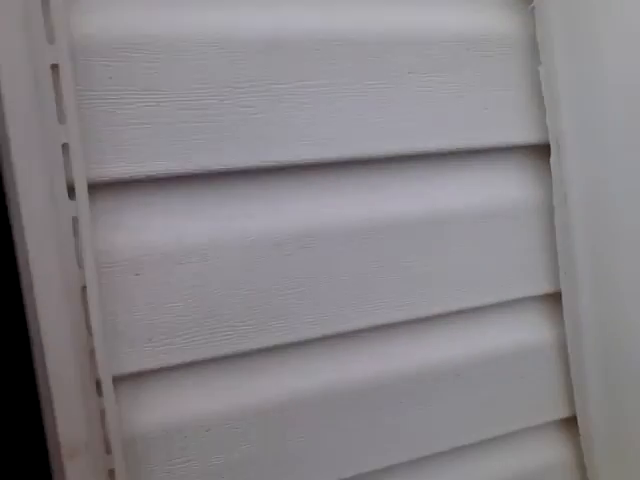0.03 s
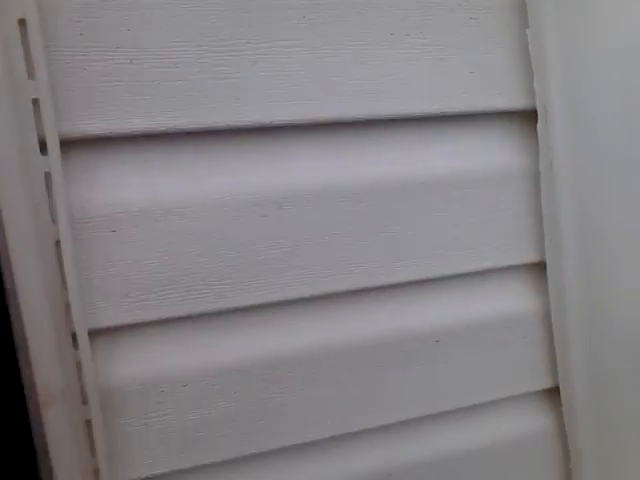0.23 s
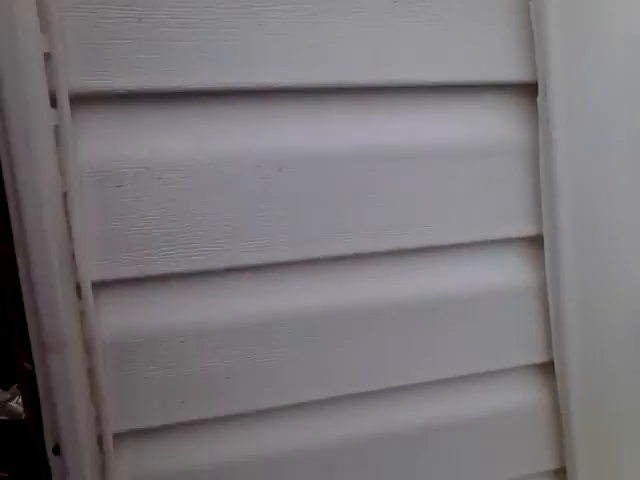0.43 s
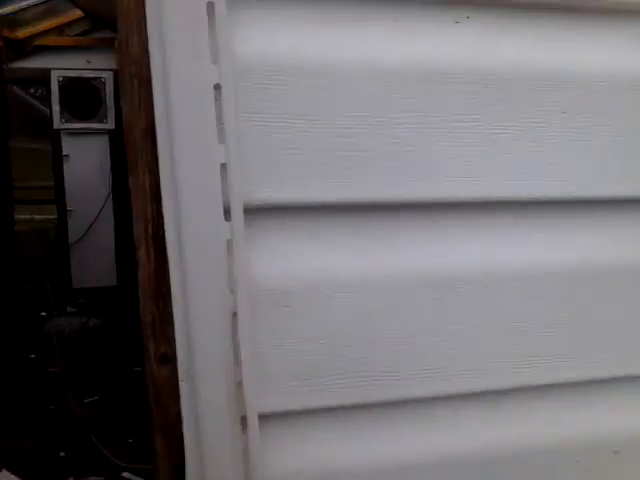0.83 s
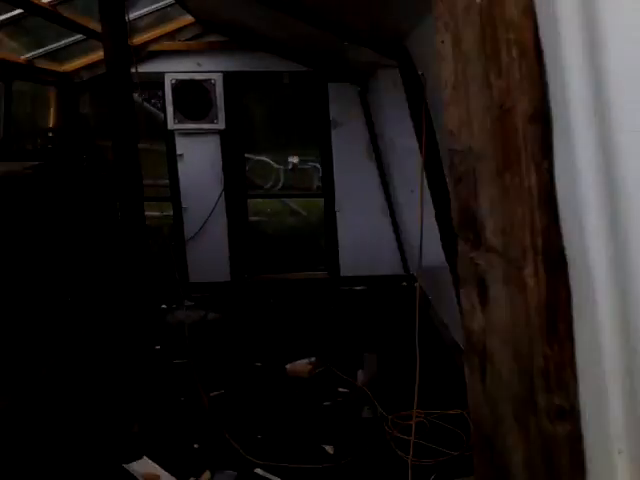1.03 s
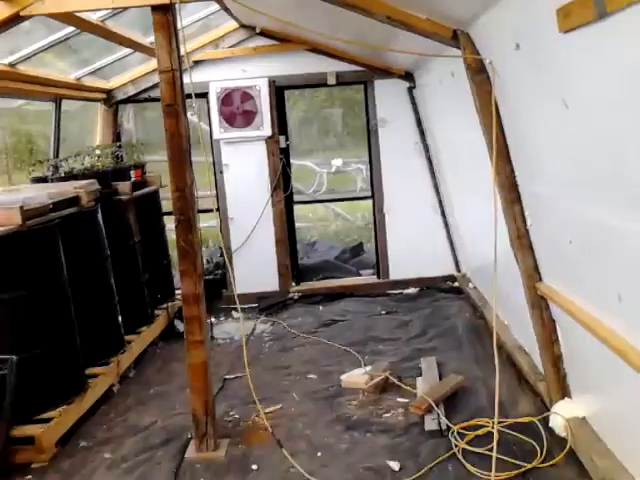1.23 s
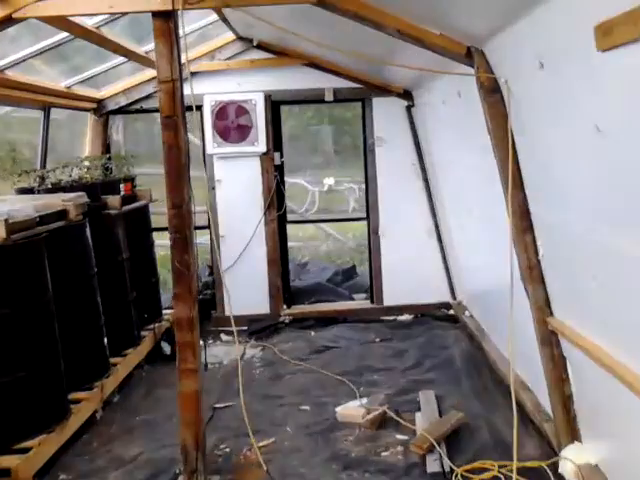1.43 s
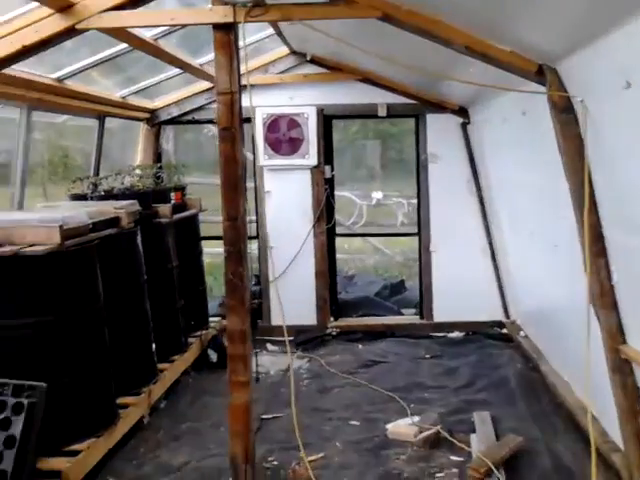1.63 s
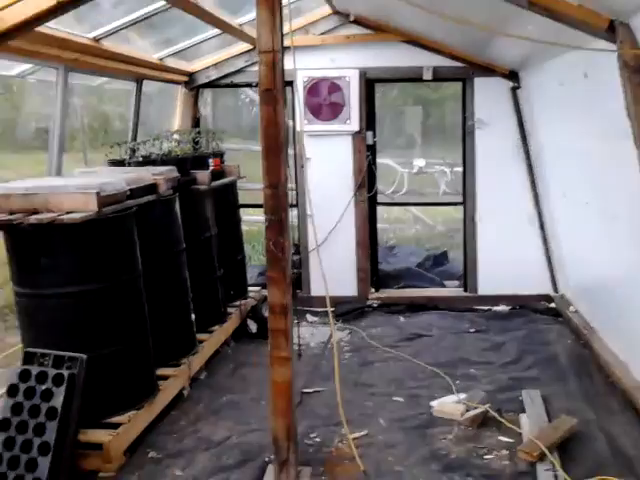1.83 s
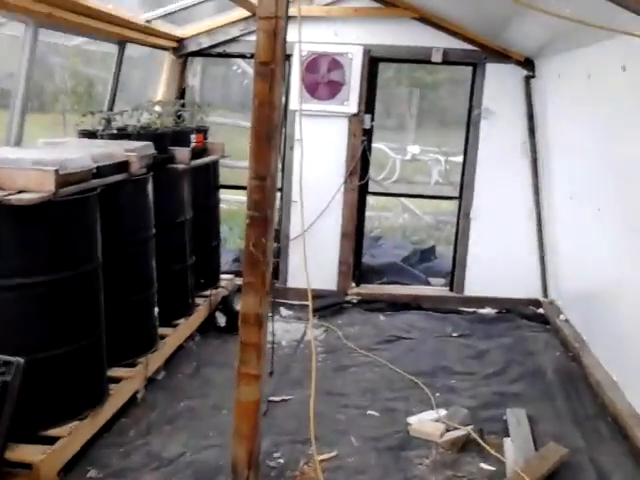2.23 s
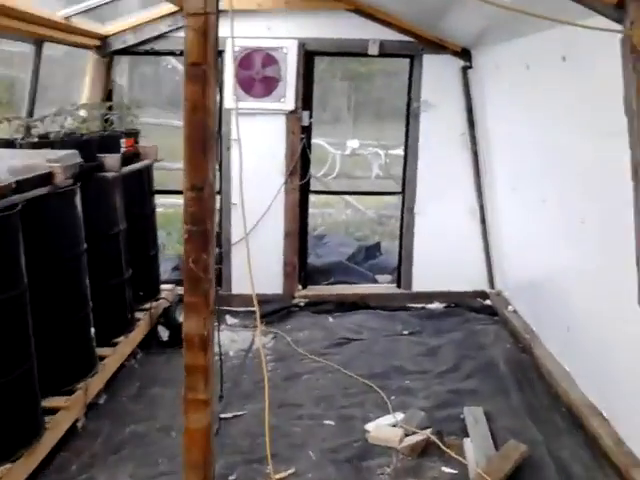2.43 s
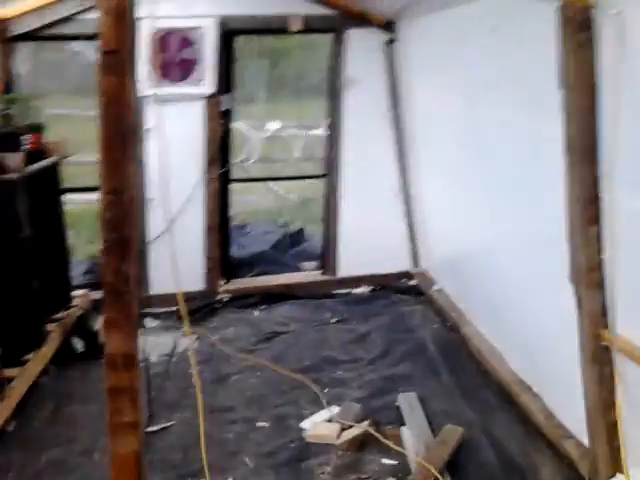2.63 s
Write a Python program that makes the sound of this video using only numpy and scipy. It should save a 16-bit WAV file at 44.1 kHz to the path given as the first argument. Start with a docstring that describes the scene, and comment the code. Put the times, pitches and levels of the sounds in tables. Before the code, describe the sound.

A greenhouse door creaks open close by, over faint outdoor air. The latch ticks, squeaks and knocks at about 0.2 and 0.5 seconds. From 0.6 the hinge gives a high, falling creak, with a soft footstep at 1.3, stalling into clicks around 1.6. After a short pause, a lower, wavering groan runs from 1.8 to 2.7 seconds, with two shoe scuffs near 2.1.

```python
"""A greenhouse door is unlatched and swung open close to the microphone, over faint outdoor air.
The latch ticks and squeaks, then knocks twice, shaking the door, while the bolt rubs on its keeper.
The dry hinge sticks and slips, each slip ringing hinge, door and a small room: first a falling creak.
A foot lands, and the creak stalls in single clicks. After a pause comes a lower groan,
with two scuffs of a sole under it."""
import sys
import numpy as np
from scipy import signal
from scipy.fft import rfft, irfft
from scipy.io import wavfile
from scipy.ndimage import uniform_filter1d

SR = 44100
rng = np.random.default_rng(int(sys.argv[2]) if len(sys.argv) > 2 else 0)


def pcm_store(signal):
    """Save signal as 16-bit PCM."""
    levels = np.round(np.clip(np.atleast_2d(signal), -1, 1) * 32767)
    wavfile.write(sys.argv[1], SR, levels.astype(np.int16).T)


N = 121275
TIME = np.arange(N) / SR
BANDWIDTH_HZ = 7250


def undb(db):
    return 10 ** (np.asarray(db) / 20)


def curve(rows, column=1):
    """One column of a table, joined by straight lines in time."""
    rows = np.array(rows)
    return np.interp(TIME, rows[:, 0], rows[:, column])


def during(rows):
    """A gate, open from a table's first time to its last."""
    return (TIME > rows[0][0]) & (TIME < rows[-1][0])


def unit(x):
    """Scale to unit energy."""
    return x / np.sqrt(np.sum(x ** 2))


def ring(x, response):
    """Play x through an impulse response."""
    return signal.fftconvolve(x, response)[:N]


def decay(t60):
    return np.exp(-np.log(1000) * TIME[:N // 4] / t60)


def tail(t60):
    """Dense reflections dying away."""
    return unit(rng.standard_normal(N // 4) * decay(t60))


def modes(rows):
    """Impulse response of a set of damped modes."""
    t = TIME[:N // 4]
    return sum(undb(db) * unit(np.cos(2 * np.pi * hz * t) * decay(t60)) for hz, db, t60 in rows)


def eq(points, size=4096):
    """Minimum-phase response of an EQ curve, rolled off at both ends."""
    hz, db = np.array(points).T
    f = np.fft.rfftfreq(size, 1 / SR) + 1
    gain = undb(np.interp(np.log(f), np.log(hz), db))
    gain /= (1 + (hz[0] / f / 2) ** 2) * np.sqrt(1 + (f / BANDWIDTH_HZ) ** 20)
    cepstrum = irfft(np.log(gain))
    cepstrum[1:size // 2] *= 2
    cepstrum[size // 2 + 1:] = 0
    return unit(irfft(np.exp(rfft(cepstrum))))


def split(x, edges_hz):
    """Cut a sound into bands, lowest first."""
    filters = [signal.butter(6, hz, fs=SR, output="sos") for hz in edges_hz]
    lows = [signal.sosfiltfilt(sos, x, padtype=None) for sos in filters]
    return np.diff([0 * x] + lows + [x], axis=0)


def pulses(times, sizes, order=8):
    """Band-limited impulses at exact times."""
    at = np.asarray(times)[:, None] * SR
    index = at.astype(int) + np.arange(1 - order, order + 1)
    shapes = np.sinc(index - at) * np.sinc((index - at) / order)
    out = np.zeros(N)
    np.add.at(out, np.clip(index, 0, N - 1), np.asarray(sizes)[:, None] * shapes)
    return out


def impact(door_db, door_t60, room_db, room_t60):
    """A direct click smeared by the metal, the door's short ring and the room's tail."""
    allpass = [.7, -1.5, 1]
    direct = signal.lfilter(allpass, allpass[::-1], signal.unit_impulse(N // 4))
    return direct + undb(door_db) * tail(door_t60) + undb(room_db) * tail(room_t60)


# Tone of the air bed: freq_hz, gain_db
AIR_EQ = [(30, 0.5), (90, -5), (300, -13.5), (600, -13), (2000, -19.5), (7200, -26.5)]


def outdoor_air(level_db=-56):
    """A steady bed of dark noise."""
    return undb(level_db) * ring(rng.standard_normal(N), eq(AIR_EQ))


# Tone of the steel latch: freq_hz, gain_db
LATCH_EQ = [(300, -5), (1200, -4.5), (1550, -0.5), (2900, -0.5), (3300, -2), (5700, -10.5), (7200, -7.5)]
# Light ticks: start_s, level_db, brightness_db
TICKS = [(0.072, -18.5, -15), (.144, -12, -15), (0.379, -19, -28), (.419, -14.5, 7), (0.432, -14.5, 0),
         (0.453, -14.5, 3), (.486, -12, 3), (.523, -12, -27), (.533, -6, -3)]


def latch_ticks():
    """Handle and latch make small contacts, some dull, some bright."""
    out = 0
    for start_s, level_db, brightness_db in TICKS:
        click = impact(door_db=3.5, door_t60=.046, room_db=-3.5, room_t60=.15)
        low, treble = split(ring(click, eq(LATCH_EQ)), [2400])
        out += ring(pulses([start_s], [undb(level_db)]), unit(low + undb(brightness_db) * treble))
    return out


# Glide of the squeak: time_s, pitch_hz, level_db
SQUEAK = [(.19, 1550, -62), (.199, 1545, -17), (.208, 1750, -22.5), (.212, 1640, -18.5), (.218, 1810, -34)]


def bolt_squeak(harmonics_db=(-3, -14.5, -21, -25.5), jitter=.22, flutter_db=3):
    """The bolt gives a rough chirp just before it lets go."""
    pitch_hz = curve(SQUEAK) * (1 + jitter * rng.standard_normal(N))
    phase = 2 * np.pi * np.cumsum(pitch_hz) / SR
    tone = sum(undb(db) * np.sin(k * phase) for k, db in enumerate(harmonics_db, 1))
    flutter = uniform_filter1d(rng.standard_normal(N), size=90)
    return tone * undb(curve(SQUEAK, 2) + flutter_db * flutter / flutter.std()) * during(SQUEAK)


# Modes of the door leaf: pitch_hz, level_db, t60_s
DOOR_MODES = [(45.8, -7, 0.75), (136.3, 1, 0.15), (211.3, 1.5, 0.18), (246, -11, 0.42)]
# Dull thud of the timber frame: freq_hz, gain_db
THUD_EQ = [(90, -2), (260, -3), (900, -28)]
# Hard hits: start_s, rattle_db, low_shelf_db, thump_db, crack_hz, crack_db
KNOCKS = [(0.2191, 15, -3, -1.5, 2083, 11.5), (0.5433, 14.5, -7.5, -15.5, 2864, 10)]


def latch_knocks():
    """The bolt strikes: a brief crack, a rattle of the latch and a thump of the door."""
    frame = unit(ring(tail(.38), eq(THUD_EQ)))[:N // 4]
    thump = modes(DOOR_MODES) + undb(-2.5) * frame
    out = 0
    for start_s, rattle_db, low_shelf_db, thump_db, crack_hz, crack_db in KNOCKS:
        strike = impact(door_db=18, door_t60=.083, room_db=17, room_t60=.031)
        low, high = split(unit(ring(strike, eq(LATCH_EQ)))[:N // 4], [1000])
        rattle = undb(rattle_db) * (high + undb(low_shelf_db) * low)
        crack = modes([(crack_hz, crack_db, .028)])
        out += ring(pulses([start_s], [1]), rattle + undb(thump_db) * thump + crack)
    return out


# Envelope of the scrape: time_s, level_db
RUB = [(.24, -64), (.29, -43), (.36, -63.5), (.42, -42.5), (.47, -59), (.5, -42), (.61, -43.5),
       (.66, -62.5)]


def bolt_rub(grit_db=3.7):
    """The bolt drags on its keeper: gritty noise through the steel."""
    grit = rng.standard_normal(N) * undb(grit_db * rng.standard_normal(N))
    return ring(grit / grit.std() * undb(curve(RUB)) * during(RUB), eq(LATCH_EQ))


# Unevenness of the slips: time_s, jitter_periods
SLIP_JITTER = [(.7, 0.065), (.87, 0.028), (.95, .042), (1.02, 0.02), (1.2, 0.012), (1.39, 0.032),
               (1.5, .014), (2.3, 0.007), (2.48, .014), (2.62, 0.06)]


def stick_slip(rate, roughness, scatter_db, memory=.85):
    """The dry hinge grips and lets go: one pulse a slip, uneven in timing and size."""
    rate_hz = curve(rate)
    count = np.cumsum(rate_hz * during(rate)) / SR
    times = np.interp(np.arange(1, int(count[-1]) + 1), count, TIME)
    slip_hz = np.interp(times, TIME, rate_hz)
    timing, size = rng.standard_normal((N // 100, 2))[:len(times)].T
    jitter_s = roughness * np.interp(times, TIME, curve(SLIP_JITTER)) * timing / slip_hz
    lag_s = signal.lfilter([1], [1, -memory], jitter_s)  # a late slip delays the next ones
    return pulses(times + lag_s, undb(scatter_db * size) * np.sqrt(SR / slip_hz))


# Modes of the hinge: pitch_hz, level_db, t60_s
HINGE_MODES = [(1543, -16.5, 0.088), (2735, -14.5, 0.11), (4074, -18.5, 0.16), (4510, -14, .06),
               (4680, -8.5, 0.055)]
# Door reflections against the direct click: time_s, wet_db
REFLECTIONS = [(1.25, 8), (1.5, 2), (2.1, 2), (2.25, -3), (2.42, -3), (2.62, 6)]


def swinging_door(slips, rate, tone, metal_db, step_s=.1604):
    """Slips ring hinge, door and room; the reflections crossfade as the door turns."""
    out = 0
    for centre_s in np.arange(rate[0][0], rate[-1][0] + step_s, step_s):
        wet_db = np.interp(centre_s, *np.array(REFLECTIONS).T)
        click = impact(door_db=wet_db, door_t60=.029, room_db=wet_db - 4.5, room_t60=.11)
        response = ring(click + undb(metal_db) * modes(HINGE_MODES), eq(tone))
        crossfade = np.clip(1 - abs(TIME - centre_s) / step_s, 0, 1) ** .75
        out += ring(slips * crossfade, unit(response))
    return out


def flicker(x, depth_db, rate_hz=100):
    """Each half-octave swells and fades on its own, so the partials break up."""
    bands = split(x, np.geomspace(700, 5600, num=7))
    swells_db = depth_db * rng.standard_normal((N // 100, len(bands))).T
    times = np.arange(N // 100) / rate_hz
    return sum(band * undb(np.interp(TIME, times, db)) for band, db in zip(bands, swells_db))


def ride_faders(x, levels, gate, crossover_hz=3200):
    """Normalise body and treble within the gate, then give each its envelope."""
    bands = split(x, [crossover_hz])
    return sum(band / band[gate].std() * undb(curve(levels, k)) for k, band in enumerate(bands, 1))


def hinge_ring(slips, glide, t60):
    """Slips feed one resonance that shifts with the load; it is levelled, then given its envelope."""
    carrier = np.exp(2j * np.pi * np.cumsum(curve(glide)) / SR)
    pole = np.exp(-np.log(1000) / t60 / SR)
    ringing = signal.lfilter([1], [1, -pole], slips / carrier) * carrier
    power = uniform_filter1d(abs(ringing) ** 2, size=3000)
    return np.sqrt(2) * ringing.real / np.sqrt(power + power.mean() / 10) * undb(curve(glide, 2))


# Falling pitch of the creak: time_s, slip_rate_hz
CREAK_RATE = [(.61, 936), (.662, 635), (.685, 830), (.718, 730), (.738, 643), (.772, 572), (.808, 525),
              (.825, 667), (.88, 663), (.91, 630), (.928, 622), (.947, 525), (.988, 570), (1.033, 604),
              (1.043, 527), (1.073, 525), (1.095, 464), (1.118, 546), (1.163, 565), (1.18, 542),
              (1.29, 527), (1.303, 453), (1.33, 443), (1.395, 458), (1.41, 350), (1.455, 396), (1.48, 320),
              (1.512, 305), (1.572, 158)]
# Tone of one slip: freq_hz, gain_db
CREAK_EQ = [(450, -10), (680, -17.5), (900, -10), (1800, -5), (4300, -3), (7200, -17)]
# Faders of the creak: time_s, body_db, treble_db
CREAK_FADERS = [(0.61, -53.5, -57), (0.654, -38.5, -45.5), (0.808, -30.5, -29.5), (1.12, -36.5, -35.5),
                (1.35, -38.5, -45), (1.58, -42, -40)]
# Singing resonance of the hinge: time_s, pitch_hz, level_db
CREAK_RING = [(.63, 2235, -49.5), (.94, 2363, -36), (1.19, 2860, -45.5), (1.213, 2614, -31.5),
              (1.245, 2600, -42), (1.55, 2710, -59)]
# Fader of the hinge's modes: time_s, gain_db
METAL_FADER = [(1.35, -54), (1.39, -38.5), (1.56, -37.5)]


def hinge_creak(trim_db=1):
    """Fast slips fuse into a high creak; the metal's ring comes forward as they slow."""
    slips = stick_slip(CREAK_RATE, roughness=.93, scatter_db=1.5)
    rasp = swinging_door(slips, CREAK_RATE, CREAK_EQ, metal_db=-9)
    rasp = ride_faders(flicker(rasp, depth_db=3.2), CREAK_FADERS, during(CREAK_RATE))
    metal = ring(slips, unit(modes(HINGE_MODES))) * undb(curve(METAL_FADER))
    return undb(trim_db) * rasp + hinge_ring(slips, CREAK_RING, t60=.03) + metal


# Modes of the floor: pitch_hz, level_db, t60_s
FLOOR_MODES = [(323.9, -2, 0.12), (423, 0.16, 0.15)]
# Tone of a scuffing sole: freq_hz, gain_db
SCUFF_EQ = [(500, -9), (1800, 0.5), (5000, -15)]
# Footfalls: centre_s, floor_db, thud_db, scuff_db
STEPS = [(1.33, -6, -17, -19.5), (2.083, -35, -18, -3), (2.156, -41, -16, 1.5)]


def footsteps(push_s=.0064, scuff_s=.05, grit_db=9.2):
    """Soles push briefly on the floor, thud through the timber and scuff the plastic floor sheet."""
    out = 0
    for centre_s, floor_db, thud_db, scuff_db in STEPS:
        t = TIME - centre_s
        push = unit(rng.standard_normal(N) * np.exp(-(t / push_s) ** 2))
        grit = rng.standard_normal(N) * undb(grit_db * rng.standard_normal(N))
        scuff = ring(unit(grit * np.exp(-(t / scuff_s) ** 2)), eq(SCUFF_EQ))
        floor = unit(ring(push, modes(FLOOR_MODES)))
        thud = unit(ring(ring(push, tail(.22)), eq(THUD_EQ)))
        out += undb(floor_db) * floor + undb(thud_db) * thud + undb(scuff_db) * scuff
    return out


# Last slips of the creak: start_s, level_db
STALL_CLICKS = [(1.5761, -15), (1.5826, -9.5), (1.592, -10.5), (1.6033, -10.5), (1.6203, -8.5)]


def hinge_stall():
    """The slips come so far apart that each is its own metallic click."""
    start_s, level_db = np.array(STALL_CLICKS).T
    click = impact(door_db=6.5, door_t60=.077, room_db=-3.5, room_t60=.026)
    response = unit(ring(click + undb(4.5) * modes(HINGE_MODES), eq(CREAK_EQ)))
    return ring(pulses(start_s, undb(level_db)), response)


# Wavering pitch of the groan: time_s, slip_rate_hz
GROAN_RATE = [(1.7952, 128), (1.815, 130), (1.843, 170), (1.875, 147.5), (1.95, 184), (1.965, 218),
              (2.015, 238), (2.055, 199), (2.083, 219), (2.1, 198), (2.13, 197), (2.163, 196), (2.19, 208),
              (2.248, 178), (2.295, 176), (2.32, 196), (2.363, 183), (2.388, 188), (2.443, 172),
              (2.487, 204), (2.522, 196), (2.59, 237), (2.75, 267)]
# Tone of one slip: freq_hz, gain_db
GROAN_EQ = [(205, -11.5), (290, -21), (520, -18), (850, -10.5), (1300, -6), (2100, -2), (3500, -4),
            (5000, -2), (5900, -11.5), (7200, -16.5)]
# Faders of the groan: time_s, body_db, treble_db
GROAN_FADERS = [(1.8, -35.5, -48), (1.89, -36, -41.5), (2.01, -36.5, -44), (2.06, -32, -39),
                (2.28, -32.5, -36.5), (2.4, -37, -35), (2.48, -38.5, -44.5), (2.65, -39, -50.5),
                (2.75, -51.5, -58)]
# Three singing resonances of the hinge: time_s, pitch_hz, level_db
LOWER_RING = [(1.85, 1895, -55), (1.9, 1984, -36.5), (2.07, 2140, -31), (2.14, 2240, -40.5),
              (2.28, 1700, -53.5), (2.4, 1930, -33.5), (2.5, 2060, -34), (2.7, 1900, -52)]
UPPER_RING = [(1.8, 2660, -45), (1.87, 2636, -36), (1.99, 2955, -39), (2.05, 2760, -44.5),
              (2.35, 2650, -42.5), (2.46, 2540, -36), (2.74, 2715, -53.5)]
TOP_RING = [(1.88, 4780, -43.5), (2.28, 5000, -49), (2.41, 5550, -46), (2.52, 5200, -68)]


def hinge_groan():
    """Slower slips make a low groan, with gliding resonances singing above it."""
    slips = stick_slip(GROAN_RATE, roughness=1, scatter_db=.57)
    rasp = swinging_door(slips, GROAN_RATE, GROAN_EQ, metal_db=-14)
    rasp = ride_faders(flicker(rasp, depth_db=1.5), GROAN_FADERS, during(GROAN_RATE))
    rings = [(LOWER_RING, .02), (UPPER_RING, .028), (TOP_RING, .006)]
    return rasp + sum(hinge_ring(slips, glide, t60) for glide, t60 in rings)


def scene():
    """The mono mix: hinge, latch and feet over the air bed."""
    air = outdoor_air()
    hinge = hinge_creak() + hinge_stall() + hinge_groan()
    latch = latch_knocks() + latch_ticks() + bolt_rub() + bolt_squeak()
    return (air + latch + hinge + footsteps())[None]


def record(dry, ceiling=.76, top_hz=16700):
    """A narrow-band microphone whose loudest peaks overload."""
    narrow = signal.sosfilt(signal.ellip(8, .3, 50, BANDWIDTH_HZ, fs=SR, output="sos"), dry)
    clipped = narrow / (1 + (narrow / ceiling) ** 8) ** (1 / 8)
    body, fizz = split(clipped, [8500])
    return signal.sosfilt(signal.ellip(8, .2, 70, top_hz, fs=SR, output="sos"), body + undb(-3) * fizz)


dry = scene()
out = record(dry)
pcm_store(out)
```